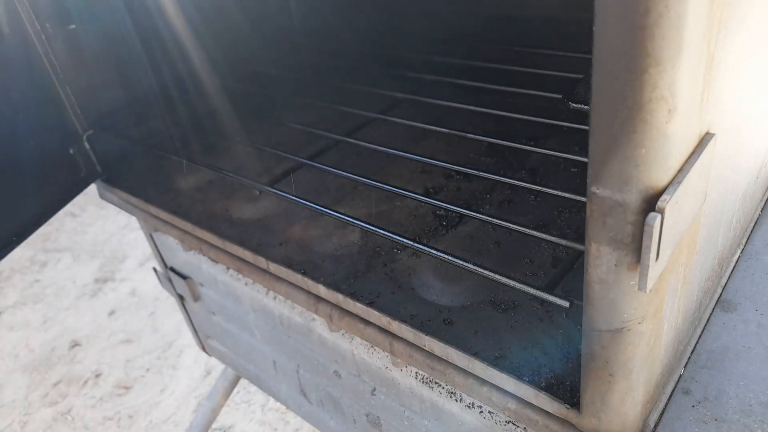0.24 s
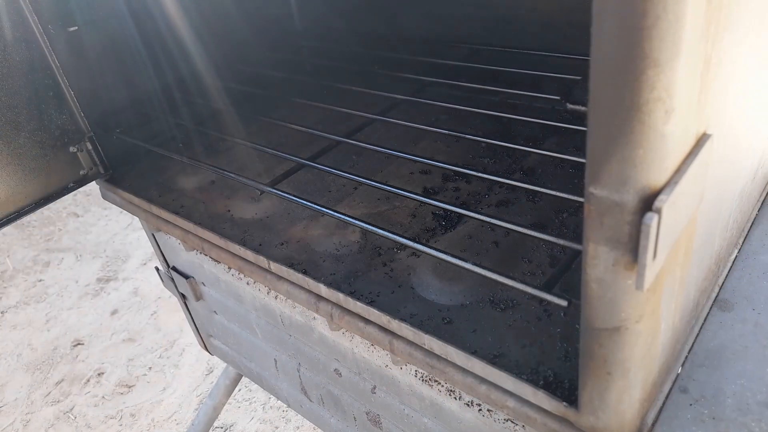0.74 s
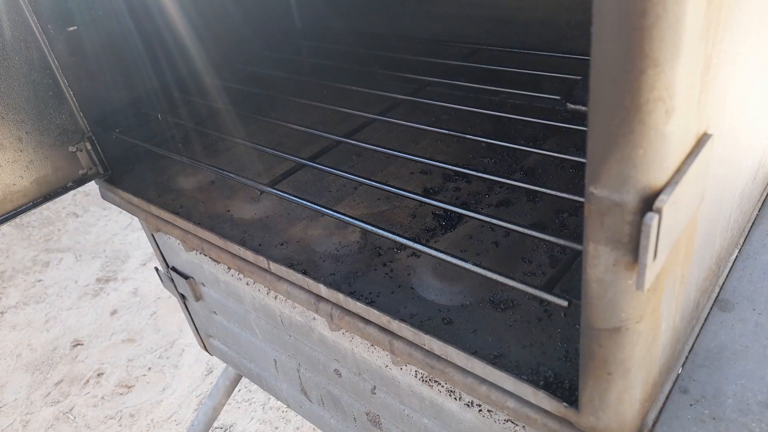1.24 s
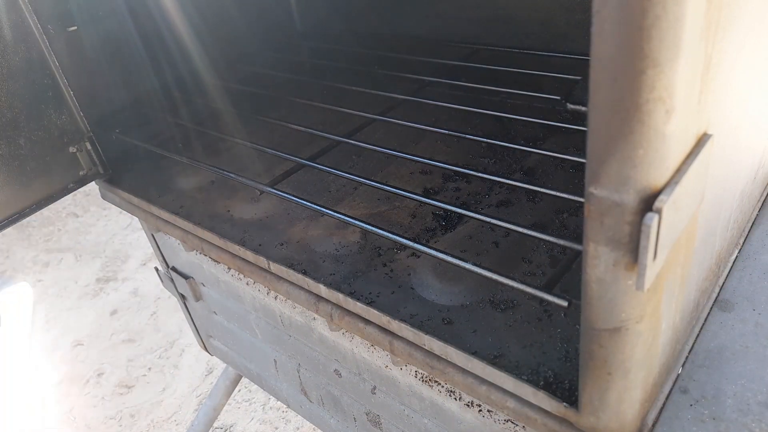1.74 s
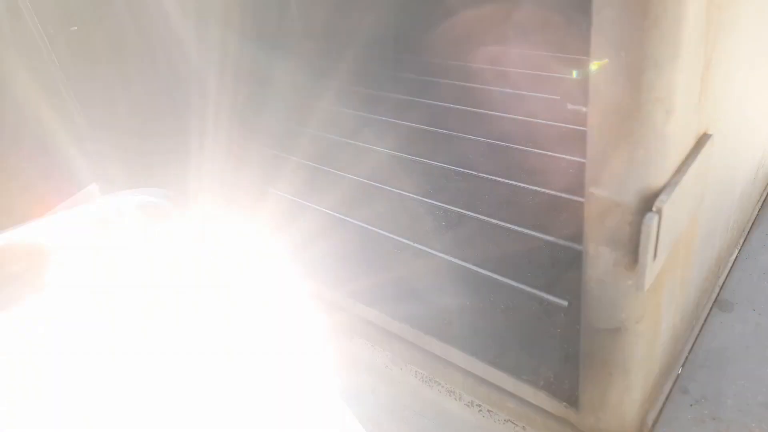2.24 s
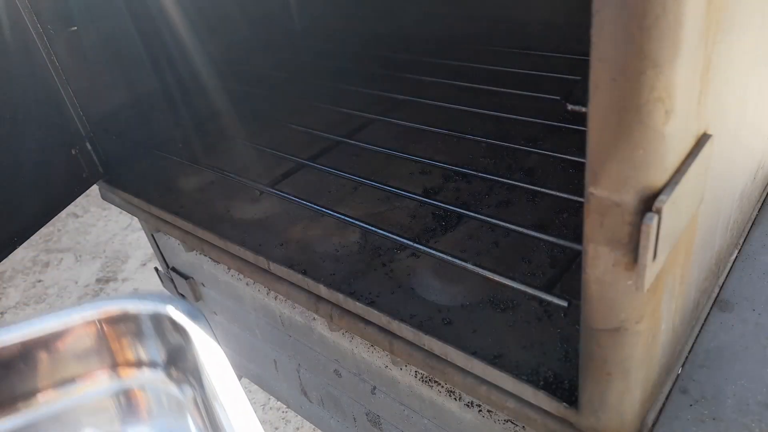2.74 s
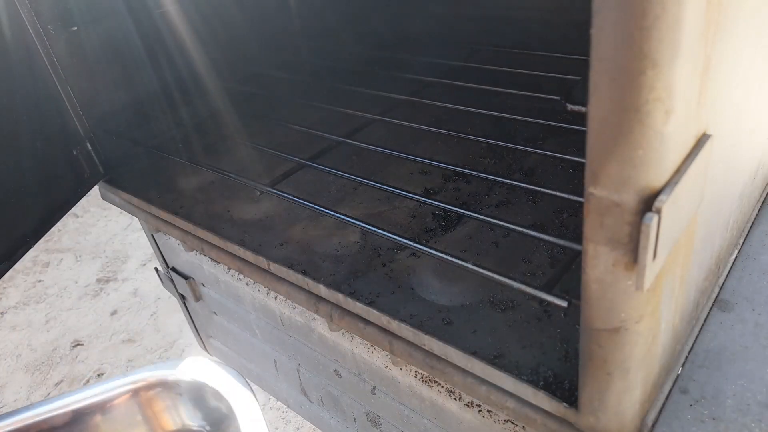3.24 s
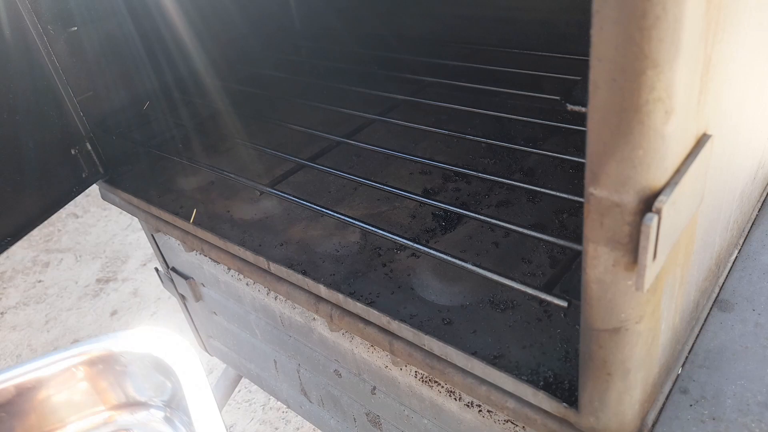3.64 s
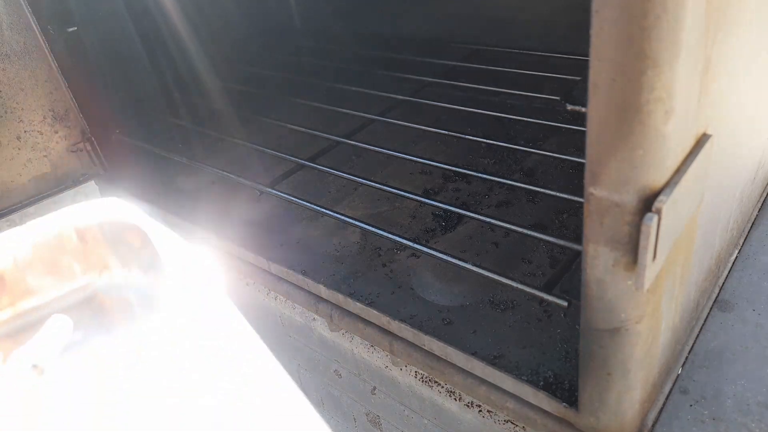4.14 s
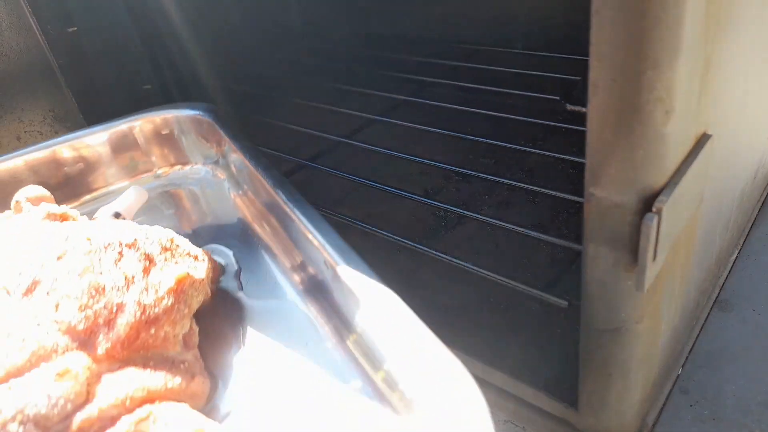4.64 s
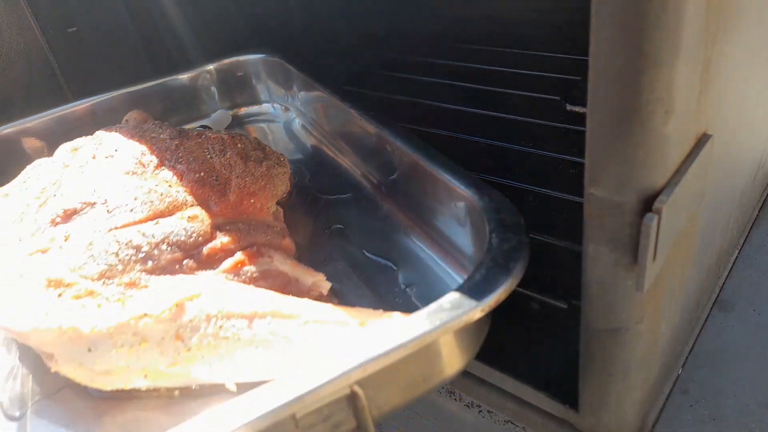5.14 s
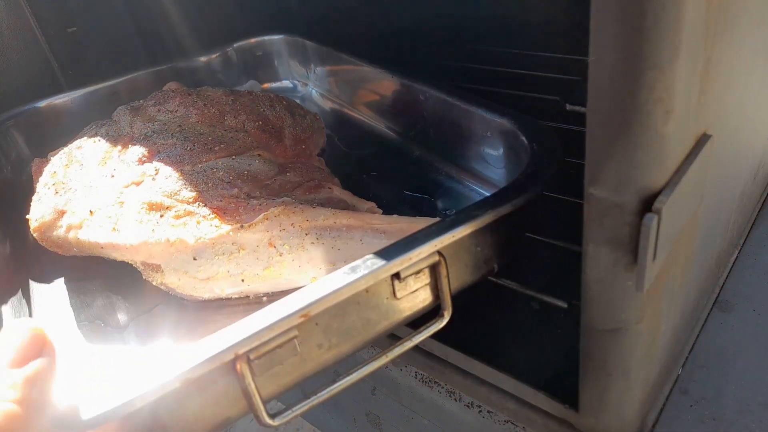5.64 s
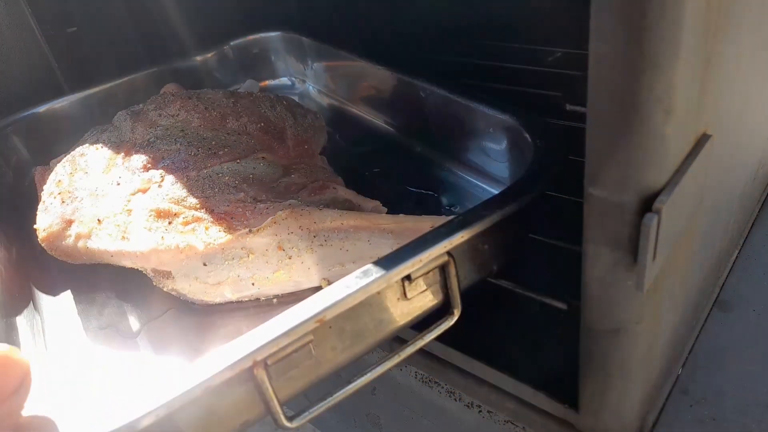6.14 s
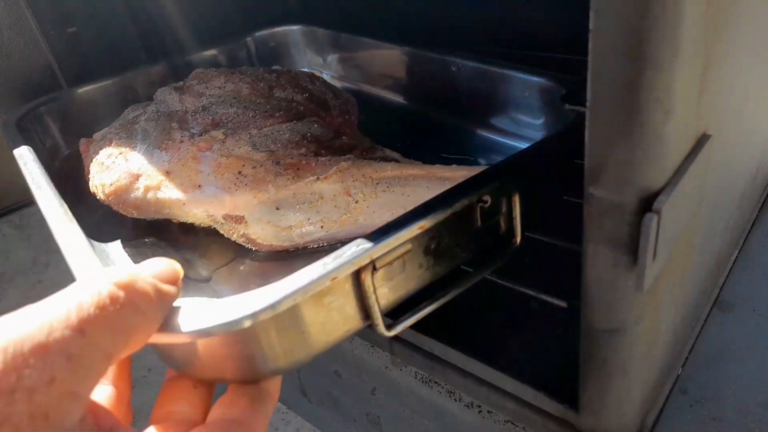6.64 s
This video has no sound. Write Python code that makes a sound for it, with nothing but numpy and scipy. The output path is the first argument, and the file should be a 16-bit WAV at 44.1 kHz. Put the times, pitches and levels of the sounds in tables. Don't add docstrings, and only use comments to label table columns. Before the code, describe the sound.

A loaded steel tray thuds, clinks and scrapes onto metal rods outdoors, its wire handle rattling, with faint birds and light wind buffeting.

```python
import sys
import numpy as np
from scipy import signal
from scipy.fft import rfft, irfft
from scipy.io import wavfile

SR = 44100
rng = np.random.default_rng(int(sys.argv[2]) if len(sys.argv) > 2 else 0)


def unload_wav(signal):
    wavfile.write(
        sys.argv[1],
        SR,
        np.round(np.clip(np.atleast_2d(signal).T, -1, 1) * 32767).astype(np.int16),
    )


def volts_from_decibels(level):
    exponent = np.asarray(level, float) / 20
    return 10 ** exponent


N = 303408


def evened(x):
    return x / np.sqrt(np.mean(x ** 2) + 1e-20)


def add(mix, s, sound):
    part = mix[..., round(s * SR):][..., :sound.shape[-1]]
    part += sound[..., :part.shape[-1]]


def noise():
    return rng.standard_normal(N)


def coloured(x, points):
    f, db = np.transpose(points)
    hz = np.fft.rfftfreq(N, 1 / SR)
    gain = volts_from_decibels(np.interp(np.log(hz + 1), np.log(f + 1), db, -90, -90))
    return irfft(rfft(x) * evened(gain), N)


def bass_cut(x, hz):
    return signal.sosfilt(signal.butter(4, hz, "high", fs=SR, output="sos"), x)


def peak_band(x, hz, sharpness):
    return signal.lfilter(*signal.iirpeak(hz, sharpness, SR), x)


def chance(hz):
    return evened(signal.lfilter(*signal.butter(2, hz, fs=SR), noise()))


def ring(x, modes, damping=1, count=0):
    t = np.arange(SR // 2) / SR
    log_range = np.log([modes[0][0], modes[-1][0]])
    crowd = [(hz, -7, .09) for hz in np.exp(rng.uniform(*log_range, count))]
    h = sum(volts_from_decibels(db - 60 * damping * t / t60) * np.sin(2 * np.pi * hz * t) for hz, db, t60 in modes + crowd)
    return signal.fftconvolve(x, h / np.linalg.norm(h))[:N]


def struck_modes(times, groups, rise, split=0):
    out = np.zeros(N)
    for s, group in zip(times, groups):
        for hz, db, t60 in group:
            t = np.arange(0, t60, 1 / SR)
            twin = 0.52 * np.sin(2 * np.pi * (hz + split) * t) * (split > 0)
            pair = np.sin(2 * np.pi * hz * t) + twin
            add(out, s, volts_from_decibels(db - 60 * t / t60) * pair * np.minimum(t / rise, 1))
    return out


def bursts(times, dbs, t60s, rise):
    out, t = np.zeros(N), np.arange(SR // 3) / SR
    for s, db, t60 in np.broadcast(times, dbs, t60s):
        add(out, s, volts_from_decibels(db - 60 * t / max(t60, .004)) * np.minimum(t / rise, 1))
    return out


def swells(starts, holds, dbs, up, down):
    t = np.arange(0, N + 64, 64) / SR
    early = np.maximum(starts[:, None] - t, 0)
    late = np.maximum(t - (starts + holds)[:, None], 0)
    power = volts_from_decibels(dbs[:, None] - up * early - down * late) ** 2
    return np.interp(np.arange(N) / SR, t, np.sqrt(power.sum(0)))


RIGHT_LAG = 15
INSIDE_S, INSIDE_LAG = 5.78, 4
BODY_PAN, WALL_PAN, CRACK_PAN, TOP_PAN, WIND_PAN = 0, 4.5, 6, 6.5, 8


def ports(x, pan_db, same=1, other=0, order=RIGHT_LAG):
    n = np.arange(N)
    late = x[n - np.where(n < INSIDE_S * SR, order, INSIDE_LAG)]
    return np.array([x * volts_from_decibels(pan_db / 2), (same * late + other) * volts_from_decibels(-pan_db / 2)])


def rough(points, envelope, pan_db, same):
    a, b = (coloured(noise(), points) * envelope for _ in range(2))
    same = np.clip(same, 0, 1)
    return ports(a, pan_db, same, np.sqrt(1 - same ** 2) * b)


# (time [s], body level [dB], wall level [dB], crack level [dB], contact t60 [s])
THUDS = [(0.0, -30, -76, -67, 0.047), (0.339, -56, -52, -52.5, 0.21), (0.369, -38, -63, -75, 0.048),
         (0.91, -49.5, -66.5, -79, 0.4), (1.137, -45, -63.5, -68, 0.51), (1.37, -34, -44.5, -36.5, 0.24),
         (2.087, -46, -53, -46, 0.26), (2.106, -37, -51, -53, 0.15), (2.586, -39.5, -46, -41.5, 0.3),
         (2.642, -37.5, -50, -40, 0.34), (3.0371, -29.5, -41, -42.5, 0.28), (3.158, -39.5, -61, -38, 0.36),
         (4.857, -38, -57.5, -62, 0.28), (5.058, -50, -47, -52.5, 0.58), (5.262, -42, -55, -46, 0.19),
         (5.313, -33, -45, -51, 0.18), (6.327, -38.5, -51.5, -66, 0.12), (6.369, -25, -32.5, -34, 0.17),
         (6.514, -10, -29, -28, 0.056), (6.805, -32, -38, -56, 0.046)]
# (frequency [Hz], level [dB], t60 [s])
BODY = [(197.5, 5.5, 0.36), (260.5, 1.5, 0.29), (302, 4.5, 0.28), (330, -5.5, 0.65), (343, -13.5, 0.25),
        (411, -1.5, 0.13), (447, -9, 0.26)]
# (frequency [Hz], level [dB], t60 [s])
WALL = [(590, -6, 0.087), (727, -5, 0.14), (794, -1, 0.12), (970, -4.5, .12), (1141, 2, 0.21),
        (1267, 5, .12), (1640, 1, .1), (2008, -4.5, 0.17), (2230, -8.5, .12), (2620, -22.5, .12),
        (3064, -17, 0.087), (3360, -6, 0.06)]
# (frequency [Hz], density [dB per Hz])
THUD_CRACK = [(710, -8.5), (1200, -16.5), (1740, -12), (2130, -15), (3530, -16.5), (5640, -22), (8000, -26),
              (10400, -36), (17600, -120)]
# (frequency [Hz], density [dB per Hz])
THUD_TOP = [(4100, -28), (7000, -28), (10000, 6), (13000, 1), (15700, -23), (15900, -80)]


def thuds():
    s, body_db, wall_db, crack_db, t60 = np.transpose(THUDS)
    edge_db = crack_db - 6.5
    push = rng.standard_normal((2, N)) * volts_from_decibels(3.9 * chance(65.0))
    body = ring(push[0] * bursts(s, body_db + 2, t60, 0.008), BODY, count=8)
    body = bass_cut(body, 165.)
    wall = ring(push[1] * bursts(s, wall_db + 1.5, 1.4 * t60, 0.00097), WALL, damping=1.25, count=40)
    wall = bass_cut(wall, 420.)
    crack_envelope = bursts(s, crack_db - 0.5, 0.63 * t60, 0.00086) * volts_from_decibels(4.0 * chance(120.0))
    crack = rough(THUD_CRACK, crack_envelope, CRACK_PAN, 0.13)
    tick = bursts(s, edge_db - 23.0, 0.017, 0.0003)
    edge = rough(THUD_TOP, tick + bursts(s, edge_db - 11.0, .5 * t60, 0.00058), TOP_PAN, 0.96)
    return ports(body, BODY_PAN, order=8) + ports(wall, WALL_PAN) + crack + edge


# (frequency [Hz], level [dB], t60 [s])
RIM = [(1450, -4, .03), (2480, 0, .03), (3470, -2, .025), (4980, 3, .022), (5940, -3, .02)]


def clatter():
    s, _, _, crack_db, t60 = np.transpose(THUDS)
    push = noise() * bursts(s, crack_db - 12.5, 0.46 * t60, .002)
    return ports(ring(push, RIM, damping=1.0, count=50), CRACK_PAN)


RING_S = [0, .375, .96, 1.165, 1.372, 2.018, 2.093, 2.352, 2.783, 3.039, 3.27, 5.52, 6.7, 6.622]
# (frequency [Hz], level [dB], t60 [s])
RINGS = [
    [(1425, -55.5, .6), (1230, -61, .6), (897, -58, .52), (2270, -55, .34), (477, -68, .32)],
    [(492, -50, .24), (848, -48.5, .19)],
    [(760, -57, .25)],
    [(790, -55, .35)],
    [(882, -55, .83), (490.6, -51, .6), (2180, -53, .6), (2960, -58, .4)],
    [(5200, -60, .07)],
    [(882, -45.5, 1.0), (1130, -47, .22), (2105, -65, .9), (461, -56, .7)],
    [(8600, -48, .17), (1490, -38, .14)],
    [(885, -55, .38)],
    [(1070, -42.5, .21), (880, -43, .7)],
    [(491, -43.5, .42)],
    [(1640, -46, .2)],
    [(1650, -52, .3)],
    [(1660, -37, .07)],
]
BOOM_S = [0, 1.14, 1.372, 2.351, 2.6, 2.65, 3.041, 3.16, 4.858, 5.401, 6.368, 6.513]
# (frequency
# [Hz], level [dB], t60 [s])
BOOMS = [
    [(251, -37, 0.32)],
    [(126.8, -53.5, 0.95)],
    [(109, -49, 0.61)],
    [(44, -40, 0.12), (60.2, -41, 0.12), (200, -47, 0.06)],
    [(118, -45, 0.45)],
    [(118.8, -46, 0.47)],
    [(97, -42.5, 0.45), (203, -28.5, 0.61), (290, -39, 0.086), (474, -39, 0.48), (783, -36, 0.097)],
    [(182.3, -29, 0.24)],
    [(299.2, -38.5, 0.45), (216.3, -40, 0.52)],
    [(92.5, -47, 0.087)],
    [(195.5, -23.5, 0.49), (310.4, -31.5, 0.42)],
    [(192.7, -20, 0.066), (315, -24.5, 0.16), (598, -24.5, 0.1), (1125, -22, 0.018)],
]


def rods():
    singing = struck_modes(RING_S, RINGS, 0.0052)
    booming = struck_modes(BOOM_S, BOOMS, 0.0041, split=11.)
    return ports(singing, WALL_PAN, order=9) + ports(booming, 1.7, order=6)


CLANG_S = [0, .34, 1.011, 1.138, 1.371, 2.1, 2.352, 2.588, 2.644, 2.784, 3.04, 3.159, 3.268, 4.716, 5.06,
           5.141, 5.434, 6.368, 6.514]
CLANG_DB = [-47.5, -65, -63, -57, -38.5, -46, -18, -42.5, -42.5, -36.5, -34.5, -30, -40, -49, -51, -30.5,
            -42, -31.5, -34]
# (frequency [Hz], level [dB], t60 [s])
LIFTED = [
    [(2130, 3, 0.099), (2540, -9, 0.17), (3340, -7, 0.13)],
    [(1470, -11, 5.0), (2250, 1, 0.21), (2455, -7, 0.14), (3881, -7, 0.063), (4996, -6, 0.17)],
    [(2676, -18, 0.12), (3000, 0, 0.089), (3700, -17, 0.056), (4060, -12, 0.9), (5300, -9, 0.33)],
    [(474, 0, 1.3), (690, 0, 5.0), (1071, -9, 2.0), (2260, -7, 0.43), (2649, -18, 0.46)],
    [(860, -13, 0.061), (1136, -17, .2), (2292, -4.5, 0.27), (3359, -31, 0.16),
     (2584, -18, 0.12)] + [(5000, 6, 0.047), (6050, -3, 0.04)],
    [(870, -13, 5.0), (1130, 4, 0.65), (1254, -5, 0.14), (2070, -6, 0.19), (3235, -13, 0.11),
     (3660, -9, 0.1)],
    [(1240, -13, 0.065), (2430, -11, 0.067), (3470, -4.5, 0.061), (4880, 3.5, 0.04), (6500, -4, 0.034),
     (7332, -22.5, 0.055), (8700, -16, 0.034), (10200, -13.5, 0.048), (11000, -21, 0.04),
     (12840, -9, 0.027)],
    [(814, -3, 0.17), (1415, -1.5, 0.13), (2230, -1.5, 0.12), (4970, -5.5, 0.16), (5640, -6, 5.0)],
    [(895, 5, 3.0), (1680, -5, 0.77), (3180, -12, 5.0), (3150, -8, 0.25)],
]
# (frequency [Hz], level [dB], t60 [s])
RESTING = [
    [(1490, 10.5, 0.027), (2250, -11, 0.072), (3000, -2, 0.03), (4240, -5, 0.021), (5300, -21.5, 0.054)],
    [(826, -11, 0.18), (1080, 2, 0.22), (1970, -7, 0.57), (4250, -22, 0.33), (5010, -16, 0.069)],
    [(775, -5, 0.051), (3020, -15, 5.0), (3310, -12, 5.0), (4500, -9, 0.028)],
    [(924, 2, 0.096), (1211, -11, 2.3), (2180, -9, 0.064), (3030, -4, 0.051)],
    [(920, -15, 0.076), (2960, 2, 0.032), (5790, 4.5, .03)],
    [(925, -11, 5.0), (2520, -3, 0.031), (5030, -23, 0.26)],
    [(980, 1.5, 0.054), (1506, 7, 0.045), (2380, -3, 0.063), (2900, -5, 0.029), (4250, -7, .025),
     (5180, -7, 0.021)],
    [(1410, 3.5, 0.15), (2440, 2, 0.045), (3280, -17, 0.18), (3770, -8, 0.22)],
    [(676, -2.5, 5.0), (794, -4, 5.0), (1600, -0.5, 5.0), (2100, -12, 0.18), (2190, -4.5, 0.083),
     (3720, -12, 0.13), (4470, -8, 0.16)],
    [(1820, -17, 5.0), (2140, -11, 0.12), (3100, -9, 0.12), (3747, -12, 0.57), (5300, -4, 0.048)],
]


def clangs():
    groups = []
    for blow_db, group in zip(CLANG_DB, LIFTED + RESTING):
        groups.append([(hz, db + blow_db, np.clip(t60, .01, .16)) for hz, db, t60 in group])
    return ports(struck_modes(CLANG_S, groups, 0.0029, split=45.), WALL_PAN)


# (full contact from [s], hold [s], grit level [dB],
# load: shake over grit [dB], speed: hiss over grit [dB])
STROKES = [(0, 0.0057, -51.5, 8.5, -32), (0.012, 0.41, -69, 10, 5.5), (0.39, 0.22, -85.5, 14, 10.5),
           (0.981, 0.0034, -63, 12.5, -9), (1.113, 0.46, -70, 8, -2.5), (1.63, 0.31, -77.5, 11, -1.5),
           (2.178, 0.0044, -73.5, 24, 3.5), (2.235, 0.34, -75.5, 6.5, -5), (2.613, 0.089, -68, -9, 7),
           (3.2, 0.0068, -52.5, 2, -19.5), (3.258, 0.017, -60, 19.5, -14), (3.563, 0.032, -77, 23.5, 0.5),
           (3.795, 0.047, -71.5, 15.5, -6.5), (3.914, 0.38, -74, 6, 2.5), (4.237, 0.017, -69, 6.5, 3.5),
           (4.329, 0.0036, -58.5, -0.5, 1), (4.423, 0.23, -85, 12, 0), (4.954, 0.036, -59, -3, -6.5),
           (5.006, 0.22, -52, -2.5, -3), (5.281, 0.16, -44.5, -1, -8.5), (5.51, 0.05, -49, 0, -7.5),
           (5.667, 0.017, -68.5, -1.5, 3), (5.79, 0.55, -82.5, 6.5, 14.5), (6.426, 0.017, -52.5, 18.5, -9),
           (6.55, 0.015, -45.5, 8, -10.5), (6.63, .3, -52.5, 9.5, -2)]
PRESS_DB_PER_S, LIFT_DB_PER_S = 166, 136
# (frequency [Hz], density [dB per Hz])
GRIT = [(260, -5), (450, -7), (571, -14.5), (817, -1.5), (971, -13.5), (1210, -9.5), (1840, -11),
        (2390, -14), (6000, -22.5), (7800, -62.5), (13200, -120)]
# (frequency [Hz], density [dB per Hz])
HISS = [(2650, -19.5), (4500, -3), (6280, -4.5), (7590, -4.5), (11200, -4), (12500, -2.5), (15700, -5),
        (15900, -60.5)]


def strokes(over_grit_db):
    s, hold, grit_db = np.transpose(STROKES)[:3]
    return swells(s, hold, grit_db + over_grit_db, PRESS_DB_PER_S, LIFT_DB_PER_S)


def slide():
    load_db, speed_db = np.transpose(STROKES)[3:]
    grit, load, hiss = strokes(0), strokes(load_db), strokes(speed_db)
    grains = volts_from_decibels(3.0 * np.minimum(rng.exponential(1, N), 4)) * (rng.random(N) < 1500 / SR)
    slips = evened(signal.lfilter([1], [1, -.985], grains))
    slips = evened(1.05 + slips) * volts_from_decibels(1.5 * chance(20.))
    shake = volts_from_decibels(2.7 * chance(21.0)) * rng.standard_normal((2, N))
    body = bass_cut(ring(shake[0] * load, BODY, damping=3.0, count=8), 160.0)
    wall = ring(0.15 * shake[1] * grit, WALL, damping=5.1, count=20)
    tray = ports(body, BODY_PAN, order=8) + ports(wall, WALL_PAN)
    coarse = rough(GRIT, grit * slips, WALL_PAN, 0.054)
    fine = rough(HISS, hiss * slips ** 0.33, CRACK_PAN, 0.1)
    return tray + coarse + fine


def chatter():
    grit = strokes(-12.0)
    out = np.zeros(N)
    for k in range(3):
        push = noise() * grit * volts_from_decibels(4.2 * np.minimum(chance(33.0), 1.8))
        out += ring(push, WALL[k::3], damping=1.9, count=4)
    return ports(out, WALL_PAN)


RUB_HZ = [2498, 5600, 12400, 14300]


def rub():
    flares = [evened(peak_band(noise(), hz, 6.)) * volts_from_decibels(7.1 * np.minimum(chance(18.), 2)) for hz in RUB_HZ]
    return ports(strokes(-17.5) * sum(flares), CRACK_PAN)


# (full from [s], hold [s], level [dB])
GUSTS = [(0, 0.07, -45.5), (0.208, 0.16, -56.5), (0.458, 0.0064, -52), (1.234, 0.013, -53.5),
         (1.42, 0.046, -57), (2.114, 0.1, -61), (2.616, 0.13, -65), (3.18, 0.073, -47.5),
         (3.297, 0.15, -62), (3.653, 0.018, -49), (3.769, 0.019, -48.5), (3.921, 0.016, -48.5),
         (3.972, 0.011, -51.5), (4.073, 0.012, -56), (4.322, 0.018, -68), (4.624, 0.023, -64.5),
         (4.877, 0.39, -53.5), (5.404, 0.012, -36.5), (5.506, 0.13, -56), (5.782, 0.017, -64.5),
         (5.891, 0.2, -60.5), (6.075, 0.14, -50.5), (6.367, 0.34, -51), (6.87, .02, -38.5)]
# (frequency [Hz], density [dB per Hz])
WIND = [(12, -46), (20, -7), (43, -4.5), (91, -3), (137, -11.5), (162, -40.5), (200, -15.5), (260, -55.5),
        (440, -120)]


def wind():
    strength = swells(*np.transpose(GUSTS), 301, 222) + volts_from_decibels(-77)
    lumps = [evened(coloured(noise(), WIND)) * volts_from_decibels(6.7 * np.minimum(chance(16.0), 1.3)) for _ in range(2)]
    lumps = np.array(lumps)
    return strength * (lumps + 0.44 * lumps[0]) * volts_from_decibels(np.array([[0], [-WIND_PAN]]))


# (frequency [Hz], density [dB per Hz])
AIR = [(59, -31), (100, -4.5), (170, -15), (337, -10), (757, -26), (898, -21.5), (957, -31.5), (1140, -26),
       (3910, -32.5), (5270, -31), (7410, -29), (14300, -27.5), (15700, -31.5), (15900, -79)]
AIR_DB = -72


def quiet_air():
    return rough(AIR, volts_from_decibels(AIR_DB + 1.0 * chance(4.3)), 1.2, 0.049)


# (time [s], crack level [dB], knock level [dB], knock frequency [Hz], t60 [s])
KNOCKS = [(1.0106, -36, -37, 690, 0.046), (1.295, -54, -52, 1900, 0.057),
          (1.6194, -54.5, -47.5, 620, 0.034), (1.7394, -63, -37.5, 624, 0.27),
          (2.783, -26.5, -21.5, 663, 0.029), (3.268, -29.5, -22.5, 715, 0.028),
          (4.7148, -34, -32, 790, 0.037), (5.058, -35.5, -31, 1600, 0.05),
          (5.139, -15.5, -27.5, 660, 0.025), (5.1435, -19, -19.5, 630, 0.018),
          (5.434, -28, -27, 720, 0.019), (6.579, -39, -26, 770, .03), (6.703, -46, -31, 760, 0.044),
          (6.8, -38.5, -33, 646, 0.12)]
# (time [s], crack level [dB], sharp edge level [dB], t60 [s])
TICKS = [(0.033, -80, -55, 0.019), (0.0747, -60, -37.5, 0.017), (0.31, -80, -72, .015),
         (2.3478, -25, -40, 0.023), (2.357, -21, -19, 0.021), (2.587, -44, -59, 0.019),
         (3.357, -41.5, -67, 0.019), (2.3507, -6, -13, 0.036), (2.463, -44.5, -55.5, 0.041),
         (3.0385, -55, -37, 0.029), (3.644, -42, -57, 0.048), (4.442, -52.5, -56, 0.045),
         (5.1225, -30, -59, 0.019), (5.264, -37, -52, .03), (5.3076, -38, -50, 0.016),
         (6.0955, -39.5, -42.5, 0.11), (6.223, -53.5, -73, 0.036), (6.286, -55.5, -69, 0.061),
         (5.058, -50, -52, .08), (6.1867, -57.5, -56.5, 0.06), (6.363, -22.5, -42.5, 0.039),
         (6.5114, -33, -42, 0.11), (6.624, -32.5, -47.5, 0.12), (6.666, -30, -39, 0.026)]
# (frequency [Hz], density [dB per Hz])
CRACK = [(350, -48.5), (650, -7.5), (1400, -4.5), (2510, -7.5), (3550, -11), (4130, -15.5), (4970, -9.5),
         (8000, -19.5), (10400, -29.5), (17600, -120)]
# (frequency [Hz], density [dB per Hz])
TOP = [(4120, -31), (7000, -3.5), (8470, -5), (9460, -2.5), (13700, -1), (15900, -6), (16500, -23.5),
       (16700, -79.5)]


def clinks():
    rise = .003
    knocks = [(*row, row[1] - 14.5) for row in KNOCKS]
    ticks = [(s, db, db - 25, 1200, t60, edge_db) for s, db, edge_db, t60 in TICKS]
    s, crack_db, knock_db, knock_hz, t60, edge_db = np.transpose(knocks + ticks)
    envelope = bursts(s, crack_db - 6.0, t60, rise)
    rim = ring(noise() * envelope, RIM, damping=1.6, count=30)
    edge = rough(TOP, bursts(s, edge_db + 3.5, 0.65 * t60, rise), TOP_PAN, 0.4)
    knock, t = np.zeros(N), np.arange(4000) / SR
    for at, db, hz in zip(s, knock_db, knock_hz):
        add(knock, at, volts_from_decibels(db - 60 * t / 0.016) * np.sin(2 * np.pi * hz * t) * np.minimum(t / 0.001, 1))
    crack = rough(CRACK, envelope, CRACK_PAN, 0.32)
    return crack + volts_from_decibels(-6.5) * ports(rim, CRACK_PAN) + edge + ports(knock, WALL_PAN)


# (time [s], hold [s], frequency [Hz], level [dB])
INSECTS = [
    (0.151, 1.2, 5230, -84.5),
    (5.75, 0.3, 6300, -77.5),
]


def insects():
    out = np.zeros((2, N))
    for s, hold, hz, db in INSECTS:
        band = evened(peak_band(rng.standard_normal((2, N)), hz, 14.))
        swell = swells(np.array([s]), np.array([hold]), np.array([db]), 40., 40.)
        out += band * swell * volts_from_decibels(3.0 * chance(3.9))
    return out


# (time [s], level [dB])
CHIPS = [
    (2.016, -54),
    (4.543, -60),
]
# (time [s], length [s], first frequency [Hz], last frequency [Hz], level [dB])
NOTES = [
    (2.7, .08, 5950, 4600, -71),
    (3.075, .08, 5750, 4500, -72),
    (3.49, .07, 2150, 2200, -78),
    (3.89, .06, 8150, 8380, -71),
    (3.94, .135, 8200, 7930, -68),
    (4.075, .085, 8280, 8100, -68),
    (4.155, .065, 8200, 8600, -75),
    (4.23, .08, 8170, 7880, -71),
    (4.14, .12, 2020, 1960, -78),
    (4.53, .115, 7150, 6700, -84),
]
# (time [s], level [dB])
FALLS = [
    (3.38, -73),
    (3.785, -71),
    (4.18, -75),
]
# (time [s], frequency [Hz], level [dB])
FALL = [
    (0, 6600, -12),
    (.03, 5950, 0),
    (.085, 5600, 0),
    (.14, 4620, -3),
    (.175, 4500, -10),
]


def birds():
    out = np.zeros(N)
    whistles = [np.add(FALL, [s, 0, db]) for s, db in FALLS]
    for s, span, a, b, db in NOTES:
        whistles.append([(s, a, db - 2), (s + span / 2, (a + b) / 2, db), (s + span, b, db - 2)])
    for rows in whistles:
        s, hz, db = np.transpose(rows)
        t = np.arange(s[0], s[-1], 1 / SR)
        waver = chance(60.)[:len(t)]
        pitch = np.interp(t, s, hz) * (1 + 0.0042 * waver)
        tone = np.sin(2 * np.pi * np.cumsum(pitch) / SR)
        level = volts_from_decibels(np.interp(t, s, db) + 2.2 + 2.0 * waver)
        add(out, s[0], level * tone * signal.windows.tukey(len(t), .15))
    t = np.arange(180) / SR
    for s, db in CHIPS:
        add(out, s, volts_from_decibels(db) * signal.chirp(t, 6600., 0.74 * t[-1], 4400.) * np.hanning(len(t)))
    echo = sum(np.roll(out, lag) for lag in (410, 730, 1190, 1710))
    return np.array([out + .2 * echo, out + .2 * np.roll(echo, 90)])


# (time [s], ring level [dB], tick level [dB])
RATTLE = [
    (3.647, -50.5, -58),
    (3.729, -61, -58),
    (3.801, -57.5, -85),
    (3.868, -57.5, -58),
    (3.892, -57.5, -56),
    (4.718, -55, -60),
]
# (frequency [Hz], level [dB], t60 [s])
HANDLE = [(931, -0.5, 0.057), (932, 4, 0.11), (1240, -14, 0.037), (2930, 1.5, 0.049), (5790, -2, 0.039)]


def handle():
    s, ring_db, tick_db = np.transpose(RATTLE)
    push = (1 + abs(noise())) * bursts(s, ring_db + 8.5, .002, .0001)
    tick = rough(CRACK, bursts(s, tick_db - 2.0, 0.045, 0.00074), WALL_PAN, 0.35)
    return ports(ring(push, HANDLE), WALL_PAN) + tick


def cabinet(x):
    t = np.arange(SR // 4) / SR
    sparse = rng.choice([-1., 1.], (2, len(t))) * (rng.random((2, len(t))) < .05)
    taps = sparse * volts_from_decibels(-60 * t / 0.096) * (t > .003)
    dull = signal.lfilter(*signal.butter(1, 4500., fs=SR), x)
    return signal.fftconvolve(dull, taps / np.linalg.norm(taps[0]), axes=1)[:, :N]


def scene():
    hits = thuds() + clinks() + handle() + rods() + clangs()
    sliding = slide() + chatter() + rub()
    outdoors = wind() + birds() + quiet_air() + insects()
    return hits + volts_from_decibels(-5.5) * cabinet(hits) + clatter() + sliding + outdoors


def low_pass(x):
    return signal.sosfilt(signal.butter(12, 16650, fs=SR, output="sos"), x)


def record(dry):
    resonant = dry + 0.1 * peak_band(dry, 5050., 9.)
    heard = signal.sosfilt(signal.ellip(10, .5, 80, 16600, fs=SR, output="sos"), resonant)
    heard = heard - 0.25 * peak_band(heard, 7450., 12.)
    heard = bass_cut(heard, 49.0)
    return low_pass(heard)


dry = scene()
out = record(dry)
unload_wav(out)
```